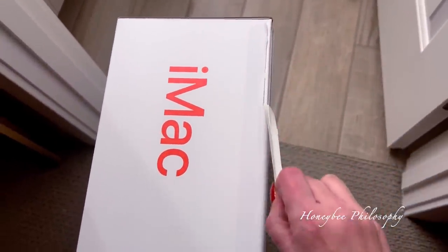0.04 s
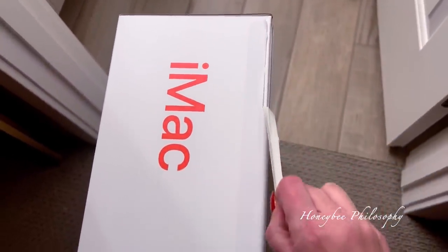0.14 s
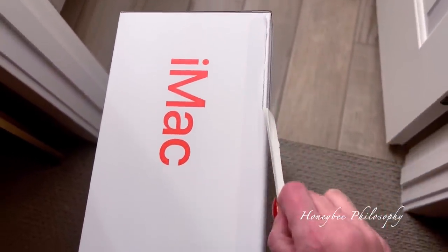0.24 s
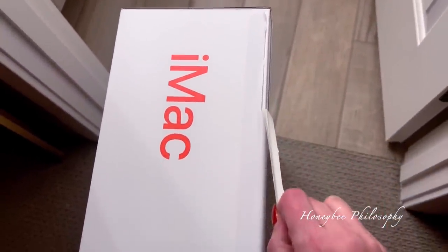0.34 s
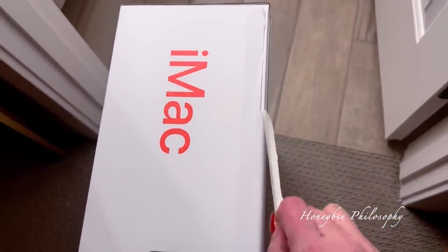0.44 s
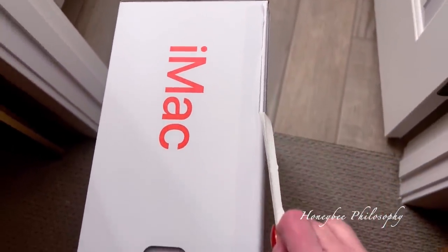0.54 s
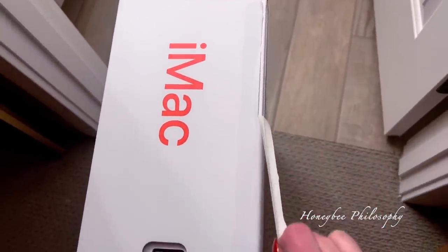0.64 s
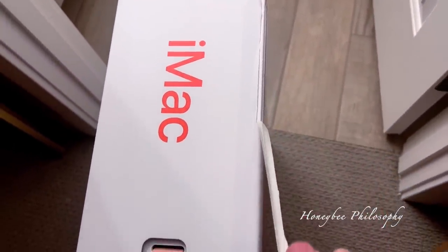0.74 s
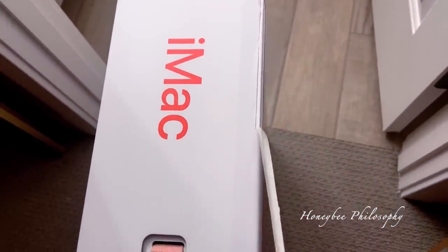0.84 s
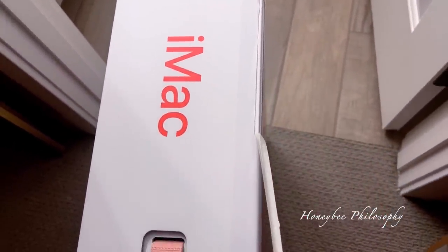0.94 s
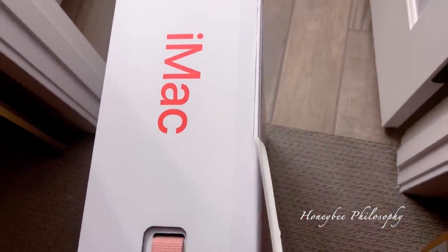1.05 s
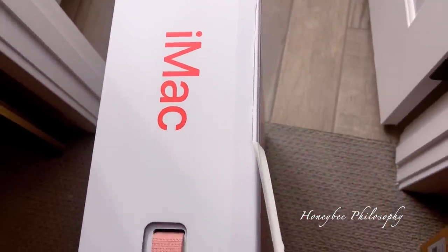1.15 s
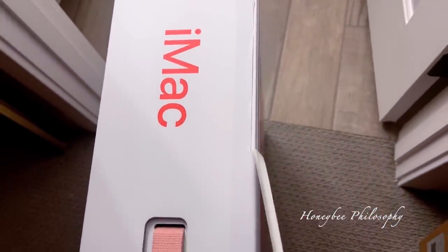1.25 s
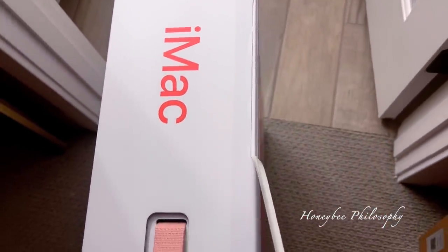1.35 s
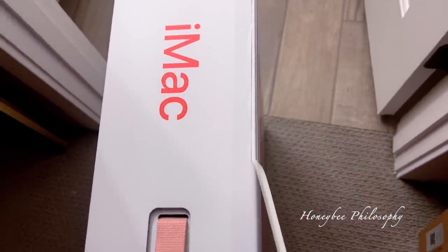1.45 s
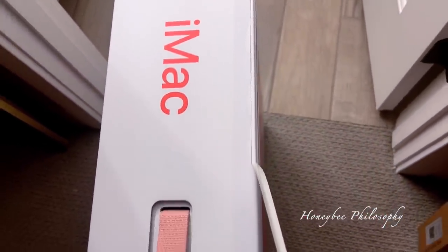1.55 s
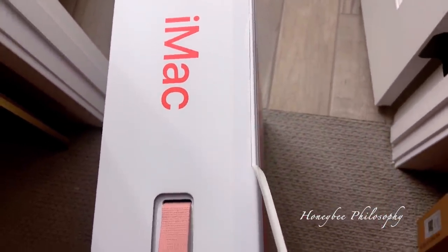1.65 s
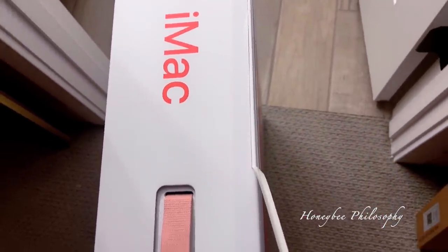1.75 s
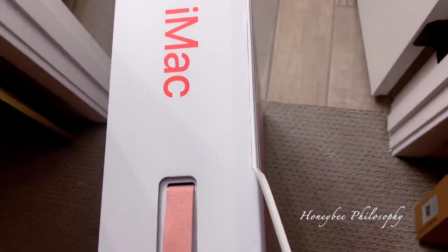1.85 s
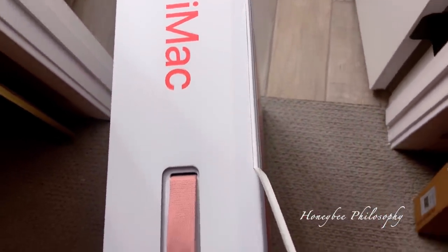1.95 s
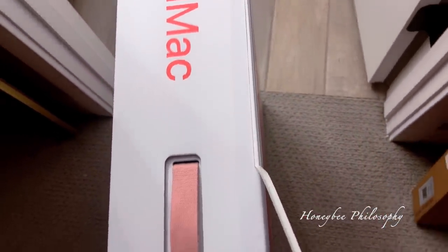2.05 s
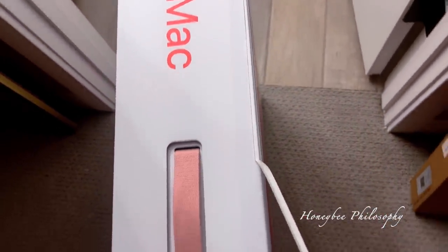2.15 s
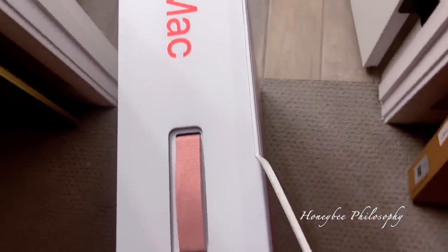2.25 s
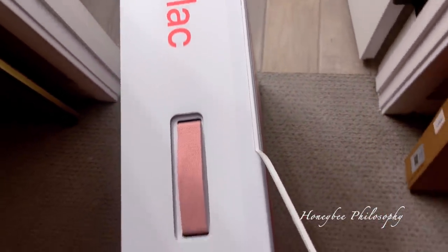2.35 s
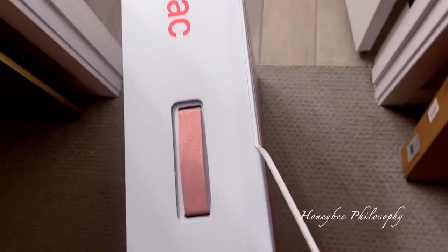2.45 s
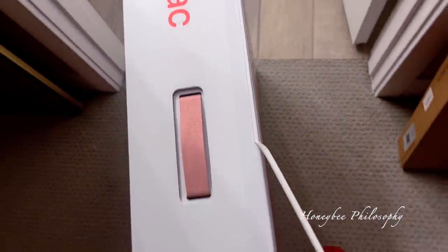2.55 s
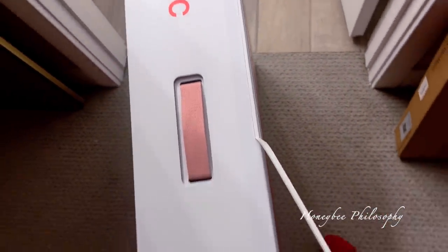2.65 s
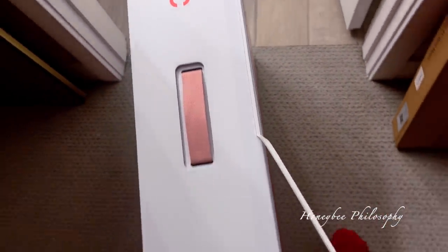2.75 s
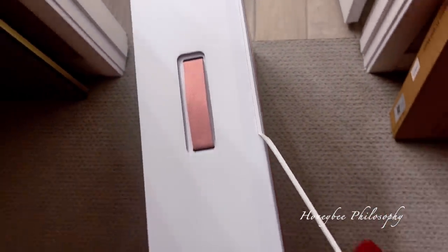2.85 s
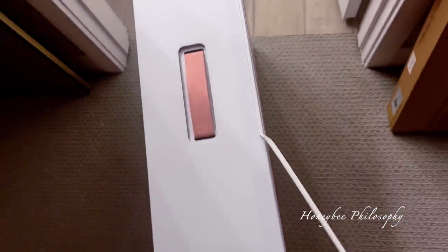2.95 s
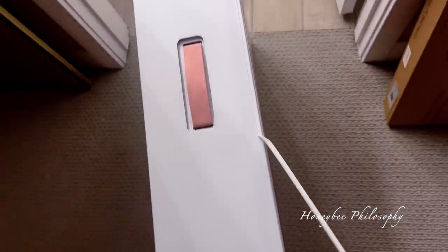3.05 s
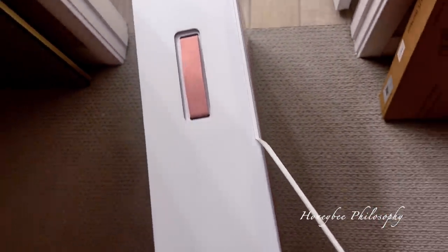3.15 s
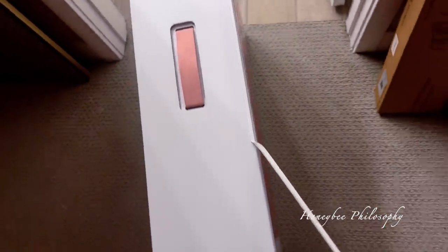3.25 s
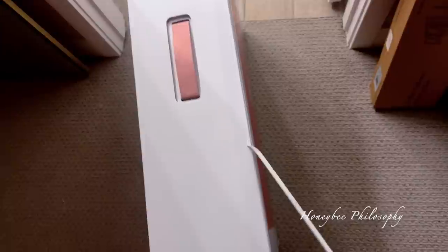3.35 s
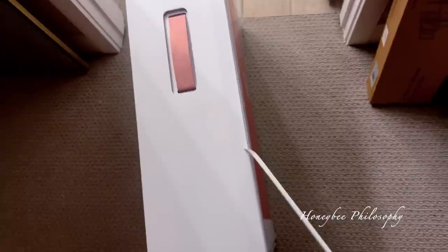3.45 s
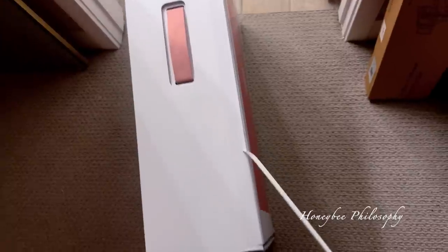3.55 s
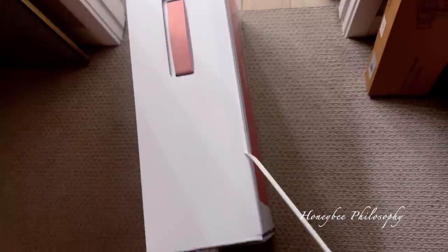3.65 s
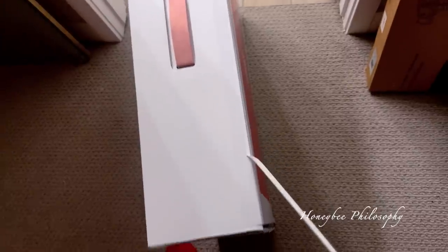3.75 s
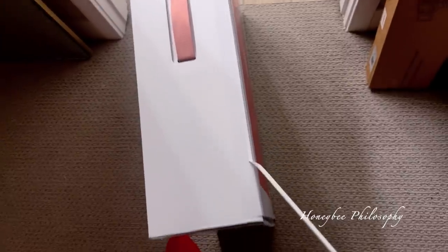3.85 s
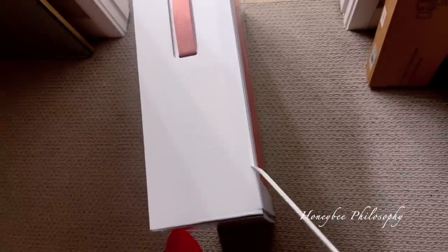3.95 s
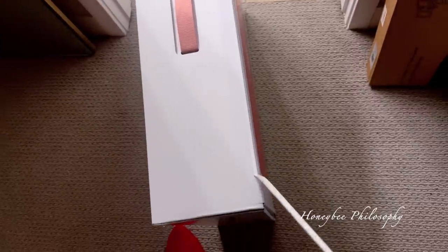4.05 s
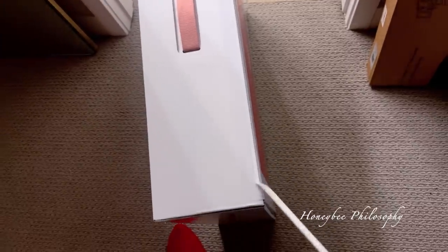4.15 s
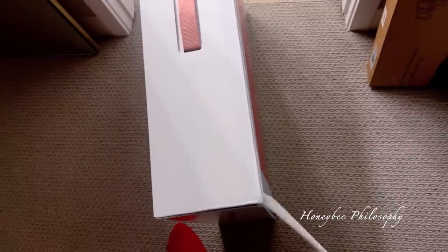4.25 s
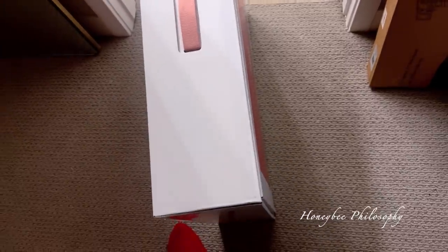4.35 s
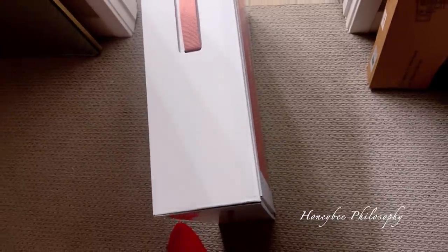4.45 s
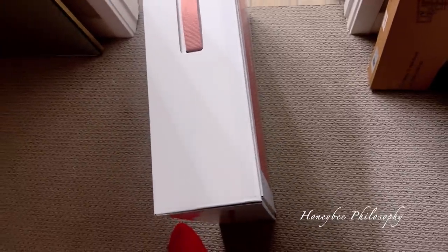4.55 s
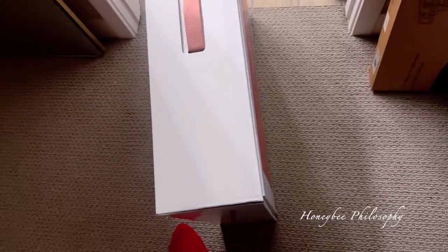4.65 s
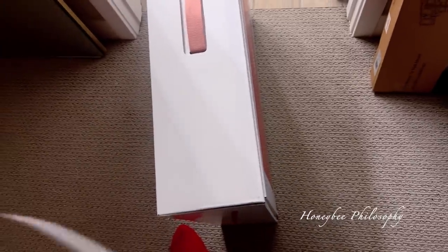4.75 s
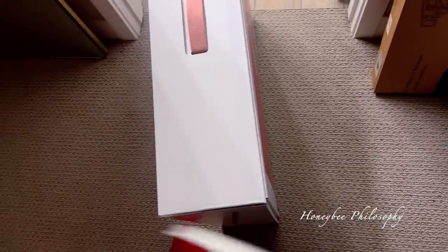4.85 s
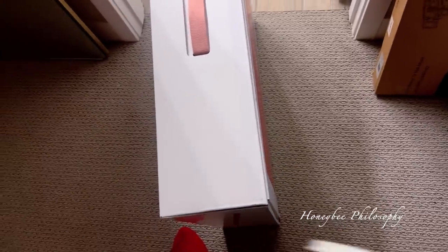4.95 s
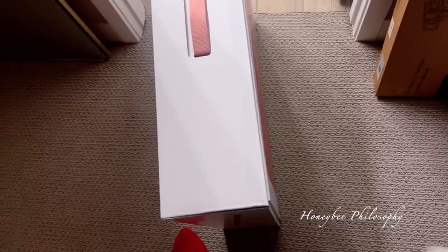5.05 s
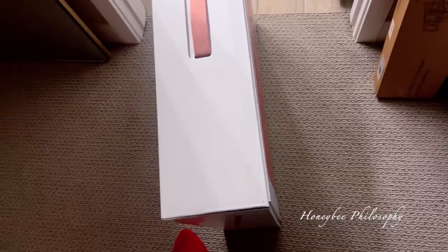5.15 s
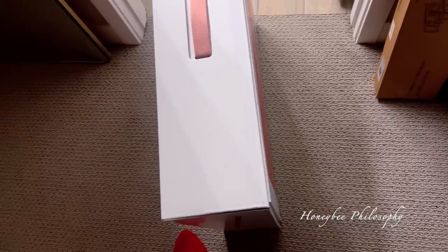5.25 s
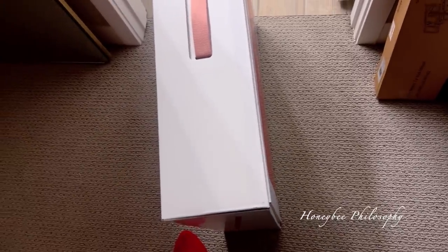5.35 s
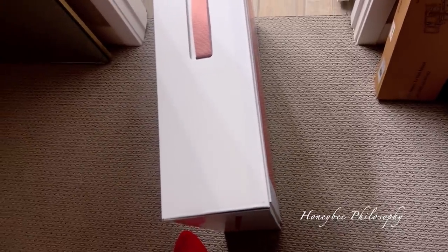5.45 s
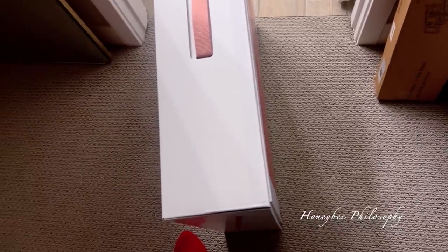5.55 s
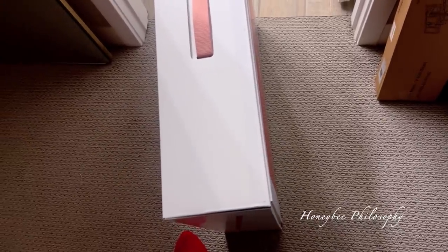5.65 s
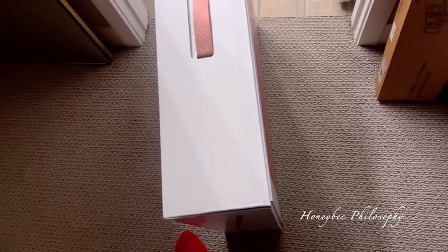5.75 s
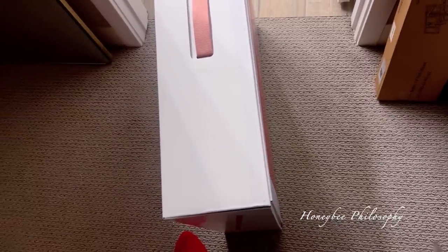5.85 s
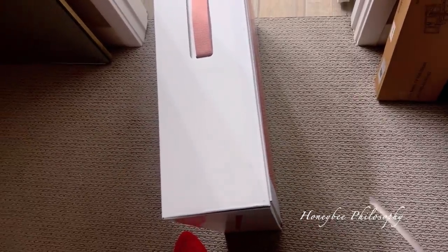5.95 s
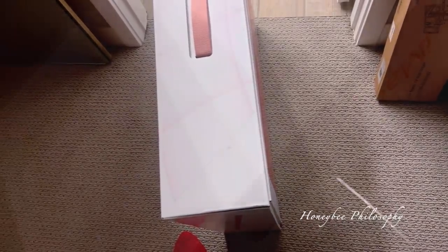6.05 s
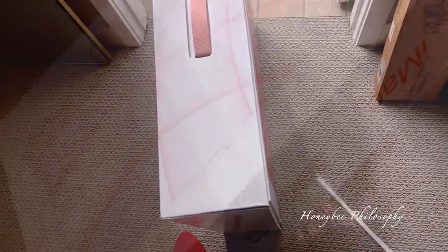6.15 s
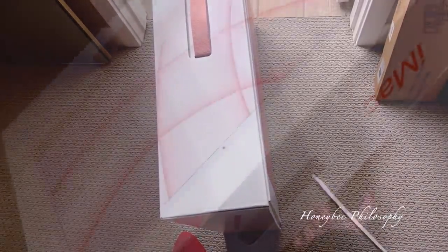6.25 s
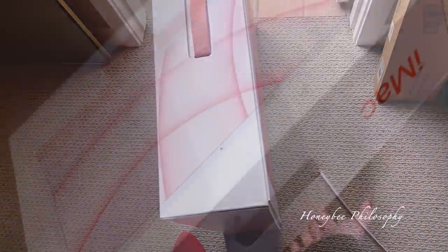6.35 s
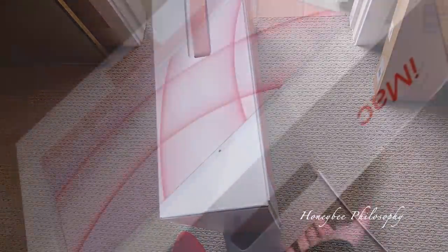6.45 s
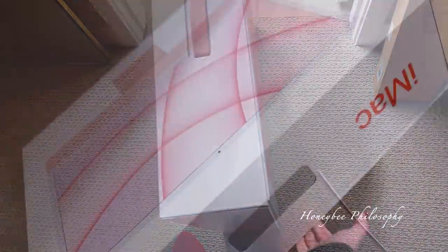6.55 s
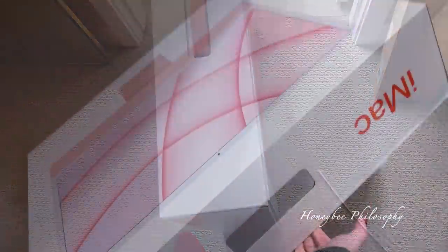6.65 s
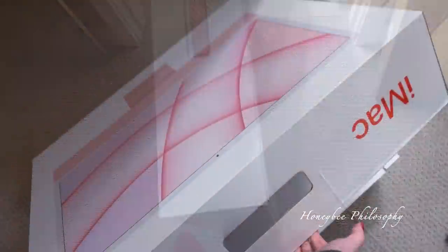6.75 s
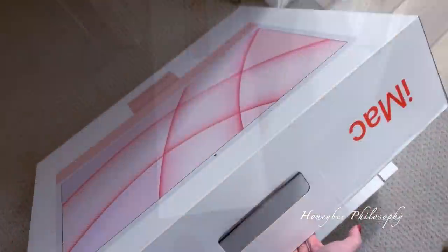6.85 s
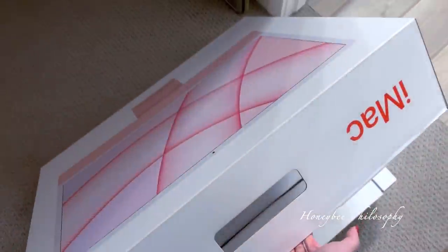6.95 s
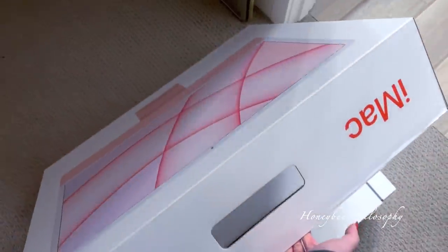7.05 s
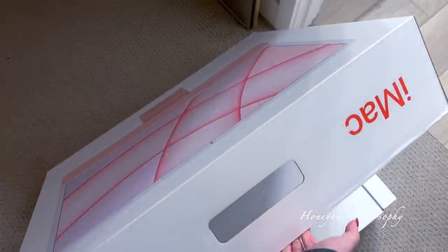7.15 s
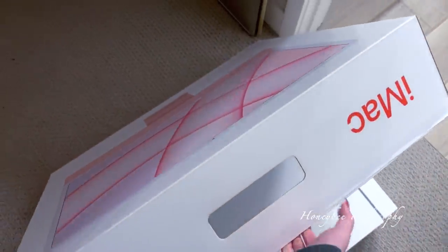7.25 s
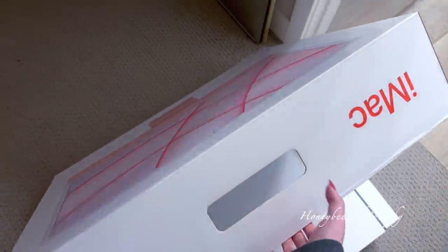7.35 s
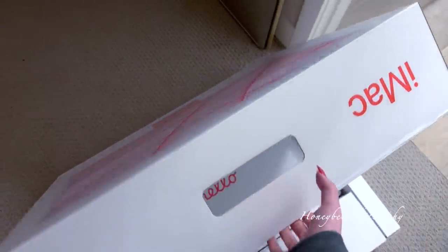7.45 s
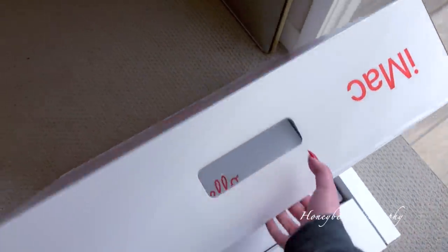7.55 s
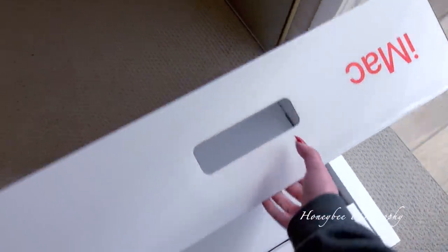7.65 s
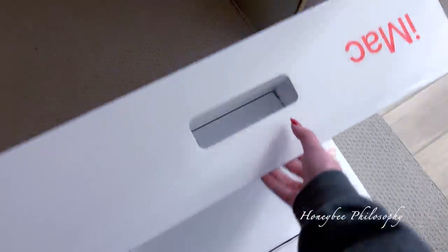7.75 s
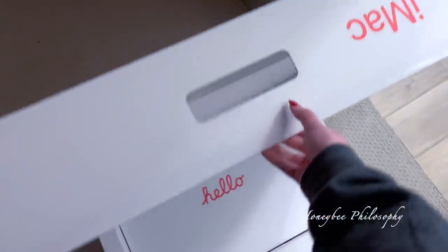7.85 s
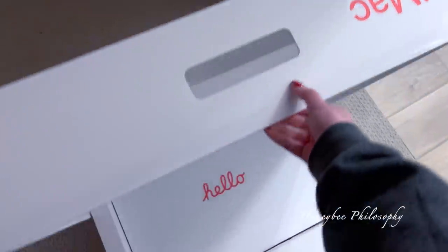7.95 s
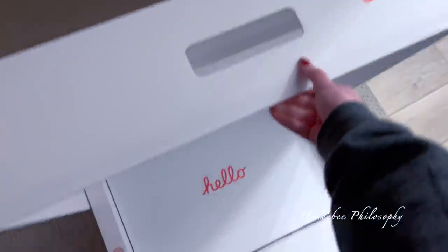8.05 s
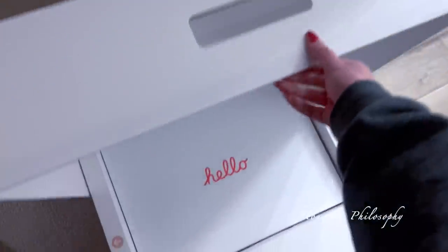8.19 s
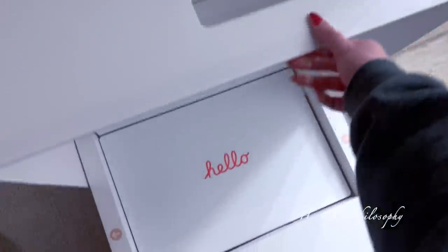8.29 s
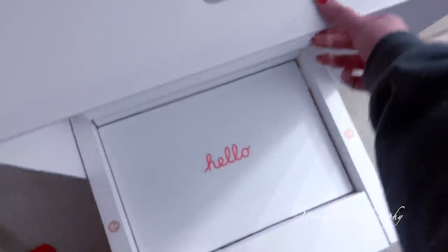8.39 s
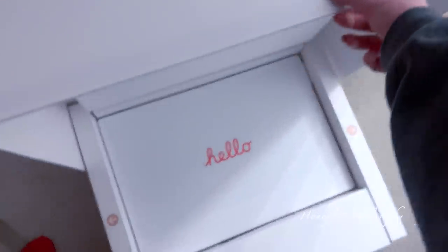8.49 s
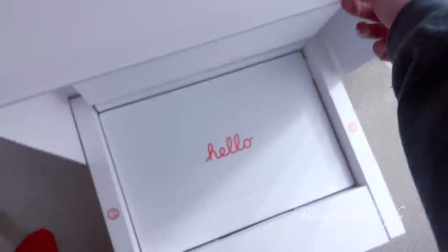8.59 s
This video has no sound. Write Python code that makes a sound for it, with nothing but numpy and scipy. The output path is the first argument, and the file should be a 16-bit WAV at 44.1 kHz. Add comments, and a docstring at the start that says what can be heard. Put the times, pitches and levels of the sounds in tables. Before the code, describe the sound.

From 0 to 4.2 s a tear strip is pulled along a large cardboard box, close up: a dense, dry crackle of breaking fibres, with raspy midrange, bright irregular snaps and a shifting hollow box tone. It is lighter at first with small hesitations, snaps thicken after 1.8 s, and it grows strongest near 4 s, ending in a quick rip and abrupt release at 4.24 s. A tiny tick at 4.4 s, then near silence over faint rumble and hiss, with another tick at 5.2 s. At 5.58 s one loud, dull knock rings hollowly, with a softer rebound. From 5.85 to 6.45 s come ticks, rubbing and a run of light taps and bumps. After a quieter stretch, soft bumps and scuffs resume around 7.5 s, a sharp click lands at 7.96 s, and a bump at 8.2 s leads to a short hissing slide near 8.35 s and a last soft bump at 8.5 s. Small carpeted hallway, short reflections.

```python
"""First a dense crackle over faint rumble and hiss: a tear strip pulled along a big cardboard box in a
carpeted hallway, until it rips free. Then the box takes a knock, and its lid is eased open with taps,
clicks, soft bumps, rubbing and a short slide. Random fibre breaks drive moving resonances of strip and
box; blows are short pulses with ringing modes; friction and room tone are shaped noise. Most contacts
reach the stereo pair directly and again from the hallway."""
import sys
import numpy as np
from scipy import signal
from scipy.fft import rfft, irfft, next_fast_len
from scipy.io import wavfile
from scipy.ndimage import uniform_filter1d

SR = 44100
rng = np.random.default_rng(int(sys.argv[2]) if len(sys.argv) > 2 else 0)


def to_wav(sig):
    """Store sig (one row per channel, or 1-D mono) as 16-bit WAV at the path in sys.argv[1].

    Samples outside -1..1 are clipped; the rate is SR.
    """
    pcm = np.clip(np.atleast_2d(sig), -1, 1) * 32767
    pcm = np.round(pcm).astype(np.int16)
    wavfile.write(sys.argv[1], SR, pcm.T)  # frames by channels


N = 380141
TIME = np.arange(N) / SR

# Event levels are at the source, ahead of hallway, panning and microphone.
# Colours are relative: every pulse made from one is scaled afterwards.

# colour of the room rumble, then of the microphone hiss: freq_hz, level_db
RUMBLE_COLOUR = [(15, -34), (25, -11.5), (38, 1), (96, -2.5), (130, -5.5), (195, -13), (315, -10.5),
                 (355, -17), (479, -15), (900, -25), (1170, -61), (1980, -120)]
HISS_COLOUR = [(410, -30.5), (700, -1), (848, -12.5), (990, 3.5), (1150, -2.5), (1250, -1.5), (1900, -2.5),
               (2490, -6), (3260, -3.5), (4270, -6), (7600, -5.5), (13900, -18), (15000, -24.5)]
RUMBLE_DB, HISS_DB = -67, -77.5  # until RISE_S
RISE_S, RUMBLE_RISE_DB, HISS_RISE_DB = 6.74, 3, 3

# decay of the hallway's reflections: freq_hz, t60_s
HALL_T60 = [(80, 0.24), (300, 0.2), (1000, 0.27), (2500, 0.11), (7000, 0.22), (15000, 0.13)]
# likeness of diffuse sound at the two microphones: freq_hz, correlation (no unit)
LIKENESS = [(100, 0.89), (250, 0.83), (450, 0.067), (800, 0), (1800, 0.71), (4000, 0.21), (15000, 0.73)]
# colour of the box at the left microphone against the right: freq_hz, left_minus_right_db
BALANCE = [(150, -4.5), (280, -5.5), (400, -8.5), (500, -4), (680, 0), (1050, -2.5), (1700, -5.5),
           (3000, -5.5)]
MIC_LOW_HZ, MIC_TOP_HZ = 42, 15900

# the tight lid rubs dully: start_s, length_s, level_db
RUBS = [(6.35, 0.11, -60), (7.52, 0.072, -68), (7.89, 0.018, -74), (8.21, 0.04, -72)]
# fingers and sleeve scuff the lid: start_s, length_s, level_db
SCUFFS = [(7.08, 0.018, -80), (7.735, .015, -68), (7.83, .08, -73.5), (7.98, 0.017, -64),
          (8.12, 0.012, -67.5)]
# the freed lid slides with a hiss: start_s, length_s, level_db
SLIDES = [(6.36, 0.089, -93), (8.34, 0.095, -69)]
# colours of rub, scuff and slide: freq_hz, level_db
RUB_COLOUR = [(80, 4), (250, -4), (450, 4), (800, -5.5), (1700, -20), (3000, -17), (4500, -16), (9000, -38)]
SCUFF_COLOUR = [(200, -9), (600, 5), (1000, -2), (1700, -5), (2600, -10), (4500, -17), (9000, -22)]
SLIDE_COLOUR = [(500, -20), (2000, -6), (4500, -5), (7000, -5), (10000, -4), (12500, -10), (16000, -12)]
STROKE_ATTACK_S, STROKE_RELEASE_S = 0.069, 0.082

# tiny ticks of card edges: start_s, peak_db
TICKS = [(4.405, -50.5), (5.2095, -48.5), (5.228, -66), (5.849, -54.5), (6.094, -53.5)]
# a fold of the lid clicks: start_s, peak_db
CLICKS = [(7.09, -63), (7.731, -61), (7.9585, -34.5)]
# the lid slips in its seat: start_s, peak_db
TAPS = [(6.239, -50), (6.3405, -46), (6.389, -41), (6.441, -38.5)]
# dull bumps of the panels, the knock's rebound among them: start_s, peak_db, cutoff_hz (softness)
BUMPS = [(4.24, -39, 452), (4.249, -42.5, 105), (5.651, -28.5, 370), (5.845, -43, 460), (6.141, -41, 940),
         (6.244, -46, 447), (6.344, -49.5, 337), (6.393, -41.5, 326), (6.442, -38.5, 288),
         (6.81, -53.5, 292), (7.063, -74, 400), (7.51, -47.5, 296), (7.536, -49.5, 255), (7.591, -59, 200),
         (7.731, -53, 790), (7.76, -56, 150), (7.815, -54, 148), (7.883, -51, 450), (7.959, -53, 704),
         (7.989, -53, 700), (8.185, -45, 406), (8.53, -46.5, 420)]
# the knock on the box: start_s, peak_db
KNOCKS = [(5.5828, -10.5)]
# colours of tick, click, tap, bump and knock: freq_hz, level_db
TICK_COLOUR = [(800, -13), (3000, -9), (7500, -1.5), (11000, -2), (16000, -11)]
CLICK_COLOUR = [(150, -30), (600, -8), (900, -10), (1500, -2), (2000, -2.5), (2450, 4), (3500, -11),
                (5000, -38), (6200, -18), (7000, -23), (7900, -15), (9500, -34), (16000, -39)]
TAP_COLOUR = [(40, -38), (100, -4), (200, 5), (320, -12), (520, -13.5), (1000, -24), (1600, -11),
              (2300, -23), (3500, -18.5), (4600, -36), (5800, -30), (9000, -25.5), (11000, -38),
              (16000, -45)]
BUMP_COLOUR = [(40, -13), (100, -5.5), (180, 1), (290, 0), (450, -3), (800, -10), (1500, -22.5), (4000, 10)]
KNOCK_COLOUR = [(30, -39.5), (70, -18.5), (120, -10), (200, -0.5), (350, 7), (470, -1.5), (680, -15),
                (950, -12.5), (1200, -21), (1400, -33), (1900, -35), (2500, -53.5), (3600, -55),
                (5000, -56.5), (8500, -53), (12000, -60), (16000, -66.5)]
# modes of the lid, then of the box: pitch_hz, level_db (relative), t60_s
LID_MODES = [(760, -4, .05), (1227, -8, .04), (1534, 1, .05), (1700, 1, .04), (2550, -3, .02),
             (3050, 0, .014), (5400, -2, .008), (6200, -2, .007)]
BOX_MODES = [(97, -12.5, .27), (174.6, -6.5, 0.3), (238, -4, 0.24), (275, 2.5, 0.31), (364.4, 1.5, 0.11),
             (380.4, -3.5, 0.17), (435, 2.5, 0.27), (624, -14, 0.21), (703, -17.5, 0.1706), (820, -25, 0.2),
             (824, -25.5, .17), (910, -18.5, 0.24), (950, -21, 0.18), (985, -27, 0.2), (1030, -22, 0.16),
             (1080, -26.5, 0.16), (1212, -26, .18), (1270, -26.5, 0.23), (263, -5, 0.31), (479, -8, 0.16),
             (518, -13.5, .16), (565, -16, 0.19), (674, -16.5, .15), (1430, -36.5, .19), (1475, -38, .26),
             (1780, -43.5, .3), (1863, -42.5, .3), (2200, -48.5, .28)]
# the hollow of the lid under a bump; its level is against the bump
BUMP_RING_HZ, BUMP_RING_T60_S, BUMP_RING_DB = 335, .1, -8

# thick fibre bundles giving way: start_s, crack_peak_db, strip_ring_peak_db
SNAPS = [(0.0173, -30, -43), (0.0555, -34, -45), (0.1777, -38, -31.5), (0.2596, -30, -33),
         (0.2723, -29, -48), (0.3702, -32, -44), (0.7216, -47, -32.5), (0.8303, -32, -46),
         (0.8726, -37, -43), (0.9624, -35, -44), (1.0103, -32, -48), (1.0266, -27.5, -44),
         (1.0484, -33, -47), (1.1327, -35, -34.5), (1.1392, -37, -35), (1.1862, -29, -32.5),
         (1.5982, -26, -43), (1.827, -23, -34), (1.9661, -26, -38), (2.0233, -43, -38),
         (2.0775, -24.5, -28.5), (2.1068, -28, -36), (2.1225, -36, -38), (2.195, -25, -36.5),
         (2.224, -35, -31.5), (2.2376, -27, -29), (2.2828, -28.5, -36), (2.3007, -41, -34.5),
         (2.3396, -27, -39.5), (2.4076, -26, -35), (2.4412, -21.5, -32), (2.4612, -31, -44),
         (2.5188, -32, -33), (2.553, -43, -29.5), (2.6918, -30, -28), (2.7041, -30, -29.5),
         (2.726, -30, -38), (2.7723, -27, -30.5), (2.9044, -43, -30.5), (2.9205, -27, -34),
         (2.9356, -30, -41), (2.9872, -28, -30), (2.9982, -45, -30), (3.0295, -29, -39), (3.109, -29, -34),
         (3.145, -42, -31), (3.188, -35, -55), (3.2229, -37, -34), (3.2382, -26, -35), (3.3465, -27, -32),
         (3.4046, -34, -34), (3.4757, -28, -35.5), (3.5, -43, -32), (3.5356, -27, -48), (3.556, -18, -30),
         (3.5917, -23, -37), (3.604, -27, -34), (3.6284, -36, -39), (3.6655, -36, -33),
         (3.6831, -29, -29.5), (3.7732, -21.5, -31), (3.8337, -23.5, -45), (3.8793, -22, -34.5),
         (3.9114, -33, -27), (3.9968, -29, -31), (4.0636, -33, -36), (4.1571, -22, -45), (4.1682, -28, -44),
         (4.1964, -29, -34), (4.2156, -20, -25), (4.2257, -21, -33), (4.24, -32, -32)]
# colours of a snap's crack and of the ring it plucks from the strip: freq_hz, level_db
CRACK_COLOUR = [(1000, -16), (3000, -11), (4500, -9), (6500, 0), (9000, 4), (12500, -2), (16000, -1)]
PLUCK_COLOUR = [(200, -16), (600, -10), (1050, -8), (1400, -12), (1750, -1), (2350, 0), (2750, -6),
                (3600, -13), (6000, -24), (12000, -40)]
# a thick bundle holds the tear back just before it snaps
HOLD_LEAD_S, HOLD_LENGTH_S, HOLD_DB = .008, .016, 1.2

# the pull: fizz tells how fast the tear runs, rasp how hard the strip is pulled:
# time_s, fizz_db, rasp_db (both before gain, stalls and tugs)
PULL = [(0.0, -52, -56), (1.04, -53, -56), (1.09, -55.5, -60.5), (1.13, -51.5, -54.5), (1.55, -53.5, -58.5),
        (2.51, -50, -57), (2.67, -53.5, -59.5), (2.7, -50, -53.5), (3.22, -50, -56), (3.36, -47, -55),
        (3.45, -48.5, -57.5), (3.59, -48, -49), (3.66, -50, -52.5), (3.84, -45, -51.5), (3.86, -50, -56),
        (4.01, -46, -46.5), (4.19, -38, -50), (4.2, -40, -49.5)]
FIZZ_GAIN_DB, RASP_GAIN_DB, EASY_PULL_DB = 2, -0.44, -58
# the hand tugs, the strip rings out and the box heaves: centre_s, length_s, strip_db, box_db
TUGS = [(0.173, 0.025, 6.5, -3), (0.44, 0.2, 1, -2), (0.806, 0.18, -0.5, 3.5), (1.123, 0.11, 2, 8),
        (1.26, 0.14, 4, 4), (2.256, 0.16, 9, -1), (2.55, 0.25, 8, -0.5), (2.69, 0.13, 6.5, -1),
        (2.835, 0.037, 4.5, 4.5), (3.368, 0.44, 4.5, 1.5), (3.785, 0.14, 1.5, 1.5), (4.01, 0.12, 1, -2)]
# the tear catches: centre_s, length_s, loss_db (before each part's share)
STALLS = [(0.35, 0.059, 4.5), (0.925, 0.069, 2.5), (1.075, 0.035, 0.5), (1.42, 0.058, 2.5),
          (1.78, 0.038, 0.5), (2.045, 0.026, 3.5), (3.15, 0.029, 1.5), (4.155, 0.17, 7.5)]
# parts that follow the rasp, by name: easy_pull_db, db_per_db of effort, stall_share (no unit),
# swell_from_s, swell_to_s, swell_db; the swell stays up, and times in reverse order make a step at swell_to_s
PARTS = {"strip": (-57.5, 0.91, 1.06, 0.5, 7, 5), "overtone": (-66.5, 1.35, 2, 5.5, 4, 2),
         "panel": (-65, 0.8861, 1.47, 1.3, 1.5, 10), "box": (-57, 0.7537, 1.5, 2, 4.5, 14),
         "wall": (-64.5, 0.29, 0.56, 1.4, 2, 10), "flex": (-62, 0.1, 0.5, 0, 2, 5.5)}
# the broad wall buckles in lurches
LURCH_DB, LURCH_PER_S = 1.5, 9.9

# the hollow box changes pitch as the tear travels: time_s, pitch_hz
BOX_PITCH = [(0, 300), (.54, 272), (.69, 470), (.85, 456), (1.03, 280), (1.23, 430), (1.57, 310),
             (2.13, 356), (2.51, 290), (3.46, 343), (3.92, 286), (4.2, 314)]
# taut at first, the box rings sharply; the loosening strip damps it: time_s, width_hz
BOX_DAMPING = [(0.5, 59.3), (1.1, 124), (2.5, 128), (3.6, 144)]
# paired resonances of strip and panel, fed by turns: time_s, lower_hz, upper_hz, upper_minus_lower_db
STRIP_PAIR = [(0, 1780, 2680, -8), (.18, 1750, 2770, -4), (.5, 1610, 2540, -17), (.72, 1670, 2620, 3),
              (.88, 1730, 2400, 0), (1.0, 1770, 2250, 7), (1.15, 1730, 2500, 3.5), (1.35, 1770, 2300, 1.5),
              (1.7, 1800, 2320, -3.5), (2.0, 1760, 2300, 1), (2.27, 1760, 2150, 5.5), (2.5, 1900, 2070, -4),
              (2.75, 1750, 2000, -1), (3.15, 1870, 2190, -12), (3.55, 1610, 2150, -12),
              (3.85, 1680, 2200, 0.5), (4.05, 1770, 2130, 4.5)]
PANEL_PAIR = [(0, 660, 1000, 2), (1.2, 667, 1100, 2), (1.5, 680, 930, 1.5), (1.8, 660, 840, -6.5),
              (2.1, 590, 860, -13), (2.4, 580, 840, -8.5), (2.65, 615, 806, 7), (3.0, 630, 803, -1),
              (3.5, 652, 874, -3), (3.8, 620, 780, -15), (4.05, 590, 750, 0)]
STRIP_WIDTH_HZ, PANEL_WIDTH_HZ = 410, 300
OVERTONE_HZ, OVERTONE_WIDTH_HZ = 3095, 1250  # the strip's higher resonances, run together
WALL_HZ, WALL_WIDTH_HZ = 167.3, 26  # pitch wanders around this centre
# colours of fine fibre, coarse rasp, flexing wall and last rip: freq_hz, level_db
FIBRE_COLOUR = [(2500, -36), (5000, -31), (6200, -6.5), (7200, 4), (9500, 8), (11200, 8), (12400, 1),
                (14500, 8.5), (16000, 2)]
RASP_COLOUR = [(1500, -26), (2500, 3), (3000, 6), (3600, 6.5), (4400, 7.5), (5300, 4), (6500, 7),
               (9000, -35.5)]
FLEX_COLOUR = [(25, -20), (50, -1), (90, 1), (130, 3), (180, -17.5), (240, -6), (400, -24), (900, -69)]
LAST_RIP_COLOUR = [(100, 13), (400, 8), (900, 1.5), (1500, 5), (2050, 9), (2800, 10), (4000, 5.5),
                   (6000, 1.5), (9500, -7), (16000, 1)]
LAST_RIP_S, LAST_RIP_DB, STRIP_FREE_S = 4.215, -39.5, 4.243
# the freed strip whips away with a dying rustle
WHIP_DB, WHIP_FALL_DB_PER_S = -54, 150


def from_db(db):
    """Decibels to gain."""
    return 10 ** (np.asarray(db) / 20)


def in_time(rows):
    """Each column of a curve at every sample."""
    s, *columns = np.transpose(rows)
    return [np.interp(TIME, s, column) for column in columns]


def at_hz(points, hz):
    """Read a table on a log-frequency axis."""
    known, values = np.transpose(points)
    return np.interp(np.log(np.maximum(hz, 1)), np.log(known), values)


def evened(x, window_s):
    """Hold the running rms near 1, keeping the faster grain."""
    power = uniform_filter1d(np.atleast_2d(x ** 2).mean(axis=0), max(int(window_s * SR), 2))
    return x / np.sqrt(np.maximum(power, 1e-12))


def drift(rate):
    """Slow chance with a spread of about 1, heading for a new value rate times a second."""
    knots = rng.standard_normal(N // 8)
    return 1.22 * np.interp(TIME * rate, np.arange(len(knots)), knots)


def humps(rows):
    """Smooth brief swings in dB, one for each row of (centre_s, length_s, db)."""
    return sum(db * np.exp(-np.pi * ((TIME - s) / length_s) ** 2) for s, length_s, db in rows)


def strokes(rows):
    """Gain of hand movements that set in ahead of start_s, hold for length_s and let go."""
    gain = 0
    for s, length_s, db in rows:
        end_s = s + length_s
        corners = [s - STROKE_ATTACK_S, s, end_s, end_s + STROKE_RELEASE_S]
        gain = gain + from_db(db) * np.interp(TIME, corners, [0, 1, 1, 0])
    return gain


def pulse(colour, spread_s=0., size=8192):
    """Causal pulse of unit energy; bending waves in card run slower when low: 200 Hz lags about spread_s."""
    hz = np.arange(size // 2 + 1) * SR / size
    # folding the cepstrum gives minimum phase
    cepstrum = irfft(np.log(from_db(at_hz(colour, hz))))
    cepstrum[1:size // 2] *= 2
    cepstrum[size // 2 + 1:] = 0
    phase = 2 * np.pi * spread_s * np.sqrt(200) * (2 * np.sqrt(hz) - hz / np.sqrt(SR / 2))
    wave = irfft(np.exp(rfft(cepstrum) - 1j * phase))[:size // 2]
    return wave / np.linalg.norm(wave)


def through(x, response):
    """Convolve, mono or stereo."""
    return signal.oaconvolve(np.atleast_2d(x), np.atleast_2d(response), axes=-1)[:, :N]


def stereo_noise(size):
    """White noise of a diffuse field, as alike at the two microphones as LIKENESS says."""
    mid, side = rfft(rng.standard_normal((2, next_fast_len(size, True))))
    alike = np.clip(at_hz(LIKENESS, np.linspace(0, SR / 2, len(mid))), -1, 1)
    shared = np.sqrt((1 + alike) / 2) * mid
    opposed = np.sqrt((1 - alike) / 2) * side
    return irfft(shared + opposed * [[1], [-1]])[:, :size]


def background():
    """Room rumble and microphone hiss, each at one level until RISE_S and a little louder after it."""
    rise = TIME > RISE_S
    rumble = from_db(RUMBLE_DB + RUMBLE_RISE_DB * rise) * through(stereo_noise(N), pulse(RUMBLE_COLOUR))
    hiss = from_db(HISS_DB + HISS_RISE_DB * rise) * through(stereo_noise(N), pulse(HISS_COLOUR))
    return rumble + hiss


def diffuse(t60_table, start_s, size=24000):
    """Dense stereo reflections of unit energy, each band dying at its own rate."""
    t = np.arange(size) / SR
    noise, out = rfft(stereo_noise(size)), 0
    hz = np.linspace(0, SR / 2, noise.shape[1])
    centres = np.geomspace(60, 16000, 9)
    for centre, share in zip(centres, np.eye(len(centres))):
        band = irfft(noise * at_hz(np.c_[centres, share], hz))
        out = out + band * from_db(-60 * t / at_hz(t60_table, centre))
    out = out * (t > start_s)
    return out / np.sqrt(np.sum(out ** 2) / 2)


def placed(x, hall, hall_db, pan_db):
    """Direct sound, one sample later at the left microphone, and its return from the hallway."""
    left, right = x * from_db([[pan_db / 2], [-pan_db / 2]])
    return np.array([np.r_[0, left[:-1]], right]) + from_db(hall_db) * through(x, hall)


def leaning(x):
    """Colour each microphone's share of the box, each side by a filter of unit energy."""
    return through(x, [pulse([(hz, sign * db / 2) for hz, db in BALANCE]) for sign in (1, -1)])


def fibres(per_s, size_db, clump_db, clump_rate, surge_db, surge_rate):
    """Fibres break at random, in clumps, with sizes spread widely."""
    sizes = from_db(size_db * np.minimum(rng.exponential(1, N), 5)) * rng.choice([-1, 1], N)
    breaks = sizes * (rng.random(N) < per_s / SR)
    return breaks * from_db(clump_db * drift(clump_rate) + surge_db * drift(surge_rate))


def scattered(impulses, scatter_db, t60):
    """Each impulse, then its own brief stereo spray of reflections off card and hand."""
    keep = from_db(-120 / (t60 * SR))  # energy kept per sample
    energy = signal.lfilter([0, 1 - keep], [1, -keep], impulses ** 2 + 1e-20)
    return impulses + from_db(scatter_db) * np.sqrt(energy) * stereo_noise(N)


def strikes(rows, wave):
    """One copy of a wave for each row of (start_s, peak_db)."""
    out = np.zeros(N)
    unit_peak = wave / np.abs(wave).max()
    for s, db in rows:
        at = int(s * SR)
        out[at:at + len(wave)] += (from_db(db) * unit_peak)[:N - at]
    return out


def blows(rows, wave, scatter_db, t60):
    """Hard contacts of one kind, each with its own spray of reflections."""
    return through(scattered(strikes(rows, np.ones(1)), scatter_db, t60), wave / np.abs(wave).max())


def ringing(rows, modes, ring_db):
    """A body's modes ring on after each blow, as decaying sines."""
    t = np.arange(SR // 2) / SR
    wave = 0
    for k, (hz, db, t60) in enumerate(modes):
        wave = wave + from_db(db - 60 * t / t60) * np.sin(2 * np.pi * hz * t) * (-1) ** k
    return from_db(ring_db) * strikes(rows, wave)


def lid_friction():
    """Card catches on card in small slips: a dull rub while it is tight, a hiss once it slides."""
    slips = fibres(per_s=2500, size_db=2.4, clump_db=2.5, clump_rate=150, surge_db=3.0, surge_rate=25)
    rub = evened(through(scattered(slips, scatter_db=8.0, t60=.04), pulse(RUB_COLOUR)), window_s=.15)
    scuff = evened(through(scattered(slips, scatter_db=8.0, t60=.04), pulse(SCUFF_COLOUR)), window_s=.15)
    slide = through(stereo_noise(N), pulse(SLIDE_COLOUR))
    return strokes(RUBS) * rub + strokes(SCUFFS) * scuff + strokes(SLIDES) * slide


def ticks():
    """Card edges tick: bright short pulses with a spray of reflections."""
    return blows(TICKS, pulse(TICK_COLOUR), scatter_db=6.5, t60=0.046)


def clicks():
    """A fold of the lid clicks: short pulses with a spray of reflections."""
    return blows(CLICKS, pulse(CLICK_COLOUR, spread_s=0.00042), scatter_db=5.0, t60=0.036)


def taps():
    """The lid slips in its seat: each small blow sets the lid's modes ringing."""
    contact = blows(TAPS, pulse(TAP_COLOUR, spread_s=.004), scatter_db=-5, t60=.025)
    return contact + ringing(TAPS, LID_MODES, ring_db=-4)


def bumps():
    """Soft contacts: the softer, the less treble; each sets the hollow of the lid ringing briefly."""
    wave, out = pulse(BUMP_COLOUR, spread_s=0.00593), 0
    t = np.arange(len(wave)) / SR
    ring = np.sin(2 * np.pi * BUMP_RING_HZ * t) * np.exp(-np.log(1000) * t / BUMP_RING_T60_S)
    for s, db, cutoff_hz in BUMPS:
        soften = signal.butter(4, cutoff_hz, fs=SR, output="sos")
        out = out + strikes([(s, db)], signal.sosfilt(soften, wave))
        out = out + strikes([(s, db + BUMP_RING_DB)], signal.sosfilt(soften, ring))
    return out


def knock():
    """A blow on the box: a dull pulse spread by the card, and the box's modes ringing on."""
    return strikes(KNOCKS, pulse(KNOCK_COLOUR, spread_s=0.0052)) + ringing(KNOCKS, BOX_MODES, ring_db=-7.5)


def snaps():
    """Each thick bundle cracks and plucks the strip, in a mix of its own."""
    crack_rows = [(s, db) for s, db, _ in SNAPS]
    pluck_rows = [(s, db) for s, _, db in SNAPS]
    crack = blows(crack_rows, pulse(CRACK_COLOUR, spread_s=.0012), scatter_db=2.0, t60=.016)
    pluck = blows(pluck_rows, pulse(PLUCK_COLOUR, spread_s=.0005), scatter_db=-3.0, t60=.035)
    return crack + pluck


def resonance(x, hz, width_hz, size=256):
    """A band-pass whose centre and width move, its state carried from block to block."""
    r = np.broadcast_to(np.exp(-np.pi * width_hz / SR), N)
    out, state = np.zeros((2, N)), np.zeros((2, 2))
    # the tear is over soon after the strip is free
    for i in range(0, int((STRIP_FREE_S + .5) * SR), size):
        poles = [1, -2 * r[i] * np.cos(2 * np.pi * hz[i] / SR), r[i] ** 2]
        out[:, i:i + size], state = signal.lfilter([1, 0, -1], poles, x[:, i:i + size], zi=state)
    return out * (1 - r * r) / 2


def resonance_twice(x, hz, first_width_hz, second_width_hz):
    """Two resonances in a row at one pitch, for steeper skirts."""
    return resonance(resonance(x, hz, first_width_hz), hz, second_width_hz)


def bending(breaks, table, width_hz):
    """A pair of broad resonances that trade strength."""
    lower_hz, upper_hz, lead_db = in_time(table)
    lead_db = lead_db + 2.5 * drift(25)
    lower = evened(resonance_twice(breaks, lower_hz, width_hz, width_hz), window_s=.2)
    upper = evened(resonance_twice(breaks, upper_hz, width_hz, width_hz), window_s=.2)
    return from_db(-lead_db / 2) * lower + from_db(lead_db / 2) * upper


def part_levels():
    """Level of each part in dB: it follows the pull, sinks in stalls and shifts with tugs."""
    fizz_db, rasp_db = in_time(PULL)
    holds = [(s - HOLD_LEAD_S, HOLD_LENGTH_S, HOLD_DB) for s, _, _ in SNAPS]
    stall_db = humps(STALLS) + humps(holds)
    ring_db = humps([(s, length_s, db) for s, length_s, db, _ in TUGS])
    heave_db = humps([(s, length_s, db) for s, length_s, _, db in TUGS])
    lurch_db = LURCH_DB * drift(LURCH_PER_S)
    tugged = {"strip": ring_db,
              "overtone": 0.82 * ring_db,
              "panel": 0.5 * ring_db + 0.91 * heave_db + 0.5 * lurch_db,
              "box": 0.65 * heave_db,
              "wall": 0.88 * heave_db + lurch_db,
              "flex": heave_db + lurch_db}
    levels = {"fibre": fizz_db + FIZZ_GAIN_DB - 1.54 * stall_db + 0.29 * ring_db,
              "rasp": rasp_db + RASP_GAIN_DB - 0.36 * stall_db + 0.039 * ring_db}
    effort_db = rasp_db - EASY_PULL_DB
    for name, (easy_db, follows, stall_share, from_s, to_s, swell_db) in PARTS.items():
        swell = np.interp(TIME, [from_s, to_s], [0, swell_db])
        levels[name] = easy_db + follows * effort_db - stall_share * stall_db + tugged[name] + swell
    return levels


def tear():
    """One stream of breaking fibres sounds directly and shakes the strip, the panel and the hollow box."""
    # many single fibres break, and now and then a small bundle
    fine = fibres(per_s=7500, size_db=2.4, clump_db=2.1, clump_rate=450, surge_db=1.0, surge_rate=30)
    coarse = fibres(per_s=330, size_db=0.9, clump_db=1.5, clump_rate=100, surge_db=1.2, surge_rate=15)
    breaks = scattered(fine + from_db(17.0) * coarse, scatter_db=-3.0, t60=0.022)
    # frayed flakes of paper ring at pitches that wander from one flake to the next
    flakes = sum(resonance(breaks, hz * np.exp(.16 * drift(35)), width_hz=600) for hz in (3400, 5000, 8000))
    frayed = breaks + from_db(1.5) * flakes
    overtone_hz = np.full(N, OVERTONE_HZ)
    box_hz, box_width_hz = in_time(BOX_PITCH) + in_time(BOX_DAMPING)
    wall_hz = WALL_HZ * np.exp(.08 * drift(12))
    parts = {"fibre": through(frayed, pulse(FIBRE_COLOUR, spread_s=0.000697)),
             "rasp": through(frayed, pulse(RASP_COLOUR)),
             "strip": bending(breaks, STRIP_PAIR, STRIP_WIDTH_HZ),
             "overtone": resonance_twice(breaks, overtone_hz, OVERTONE_WIDTH_HZ, OVERTONE_WIDTH_HZ),
             "panel": bending(breaks, PANEL_PAIR, PANEL_WIDTH_HZ),
             "box": resonance_twice(breaks, box_hz, 306, box_width_hz),
             "wall": resonance_twice(breaks, wall_hz, WALL_WIDTH_HZ, 57),
             "flex": through(breaks, pulse(FLEX_COLOUR))}
    steady = sum(evened(parts[name], window_s=0.092) * from_db(db) for name, db in part_levels().items())
    # the last piece goes in one fast rip, then the strip is free
    rip = through(breaks, pulse(LAST_RIP_COLOUR))
    last_rip = from_db(LAST_RIP_DB) * evened(rip, window_s=0.01) * (TIME > LAST_RIP_S)
    whip_db = WHIP_DB - WHIP_FALL_DB_PER_S * np.abs(TIME - STRIP_FREE_S)
    whip = from_db(whip_db) * evened(rip, window_s=0.058)
    return np.where(TIME < STRIP_FREE_S, steady + last_rip, whip)


def scene():
    """Contacts sound directly and from the hallway; lid friction and background stay without its reflections."""
    hall = diffuse(HALL_T60, start_s=.007)
    box = placed(tear() + snaps(), hall, hall_db=-8.0, pan_db=0.3)
    box = box + placed(knock(), hall, hall_db=-7.0, pan_db=-0.3)
    return (background() + lid_friction()
            + placed(ticks(), hall, hall_db=-6.0, pan_db=1.0)
            + placed(clicks(), hall, hall_db=-8.0, pan_db=0.0)
            + placed(taps(), hall, hall_db=-12.0, pan_db=-1.5)
            + placed(bumps(), hall, hall_db=-3.5, pan_db=3.5)
            + leaning(box))


def record(dry):
    """The microphone loses the deepest bass; the top is cut steeply."""
    thinned = signal.sosfilt(signal.butter(3, MIC_LOW_HZ, "high", fs=SR, output="sos"), dry)
    return signal.sosfilt(signal.ellip(10, .1, 80, MIC_TOP_HZ, fs=SR, output="sos"), thinned)


dry = scene()
out = record(dry)
to_wav(out)
```